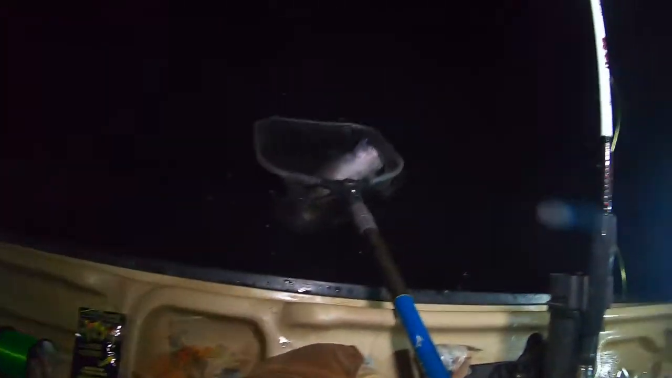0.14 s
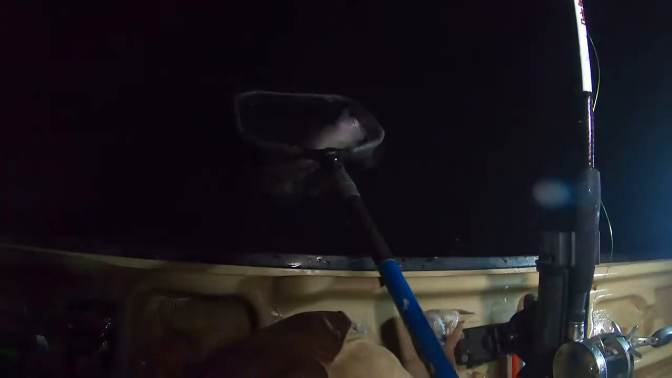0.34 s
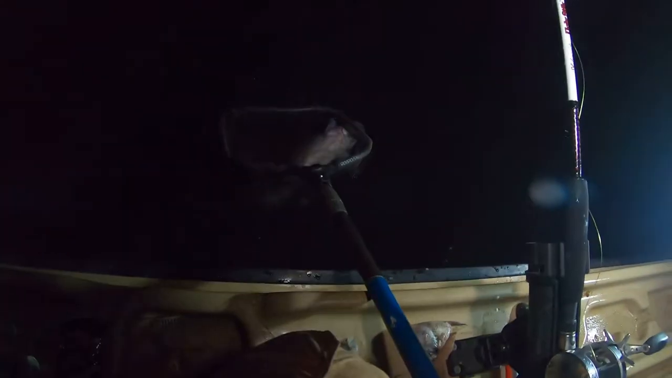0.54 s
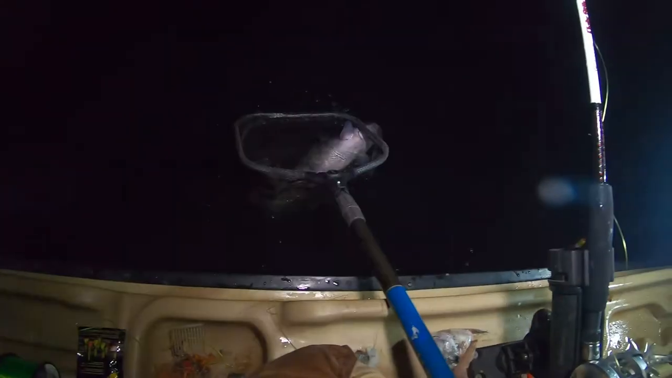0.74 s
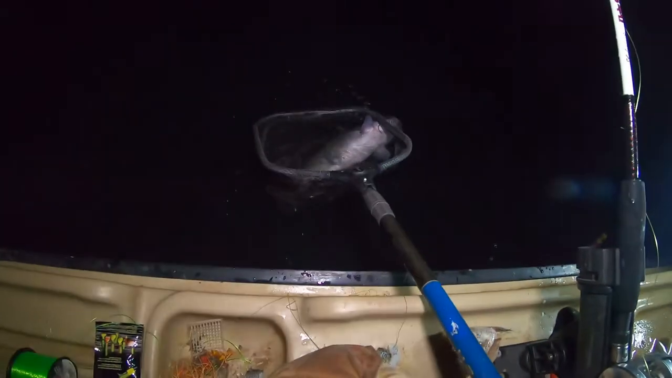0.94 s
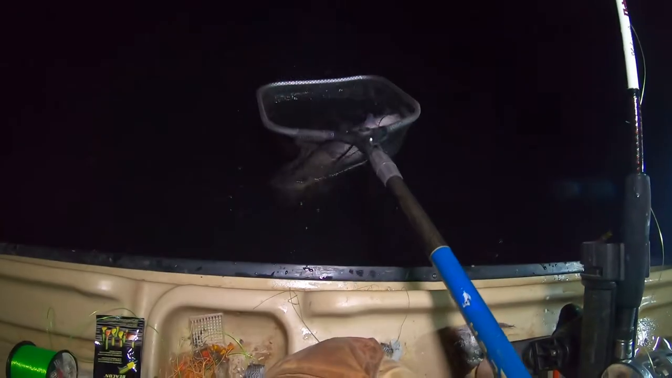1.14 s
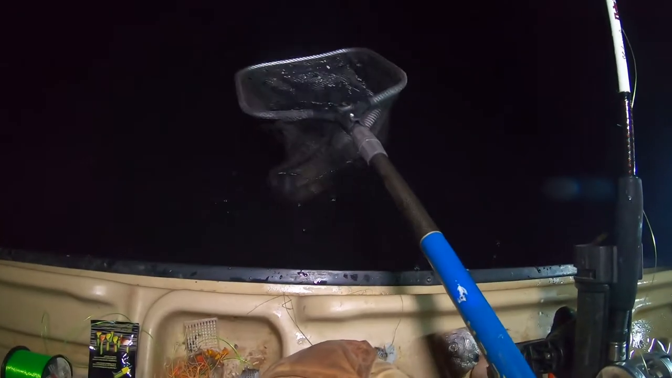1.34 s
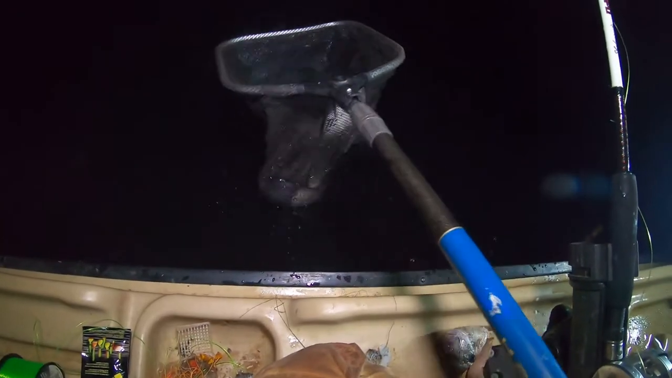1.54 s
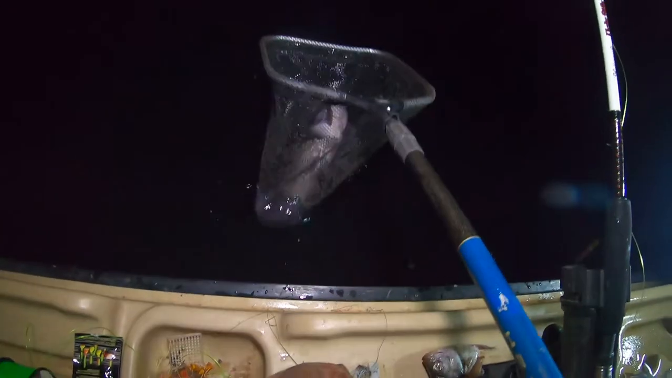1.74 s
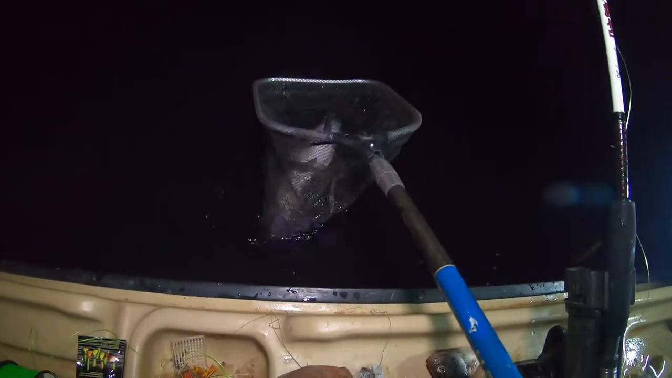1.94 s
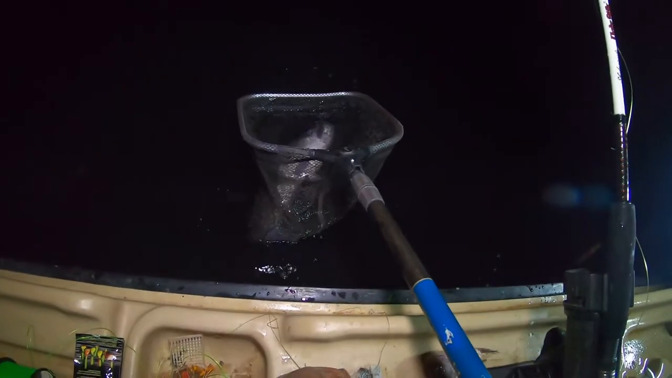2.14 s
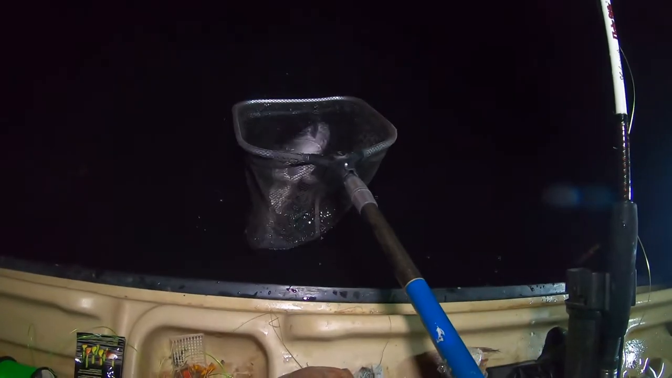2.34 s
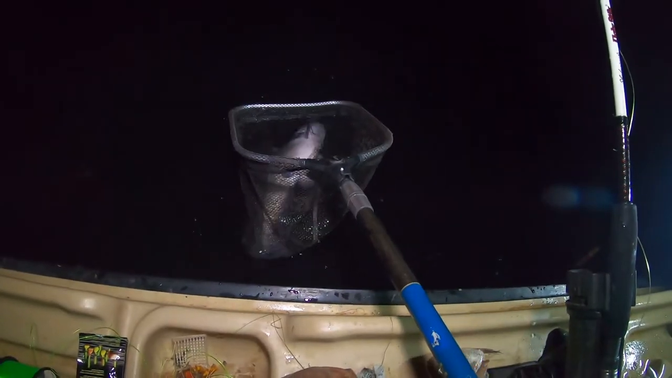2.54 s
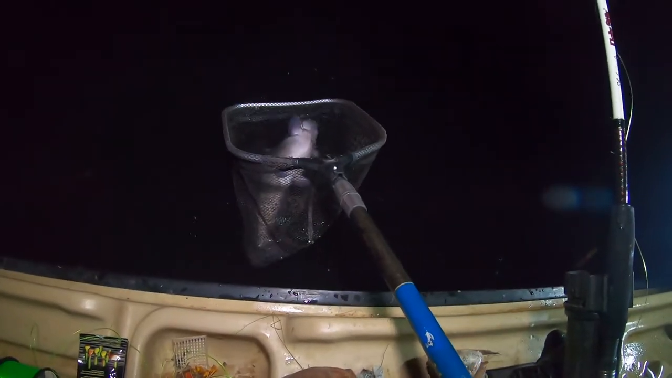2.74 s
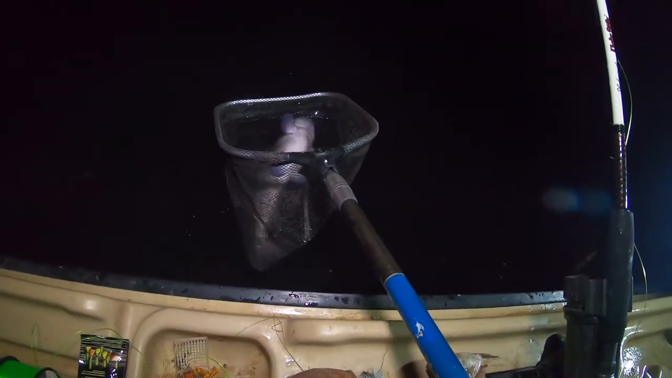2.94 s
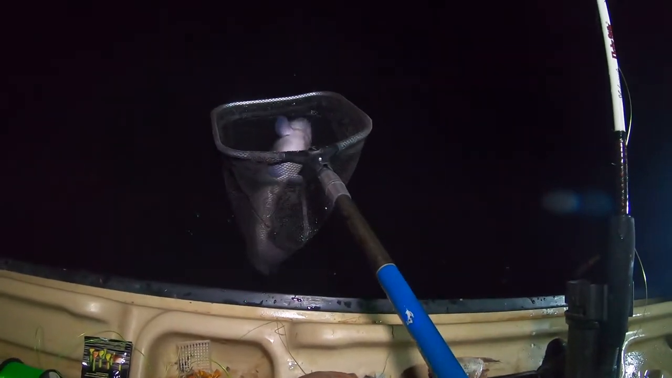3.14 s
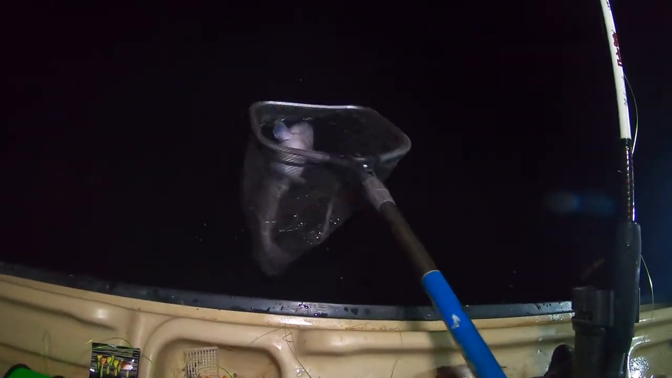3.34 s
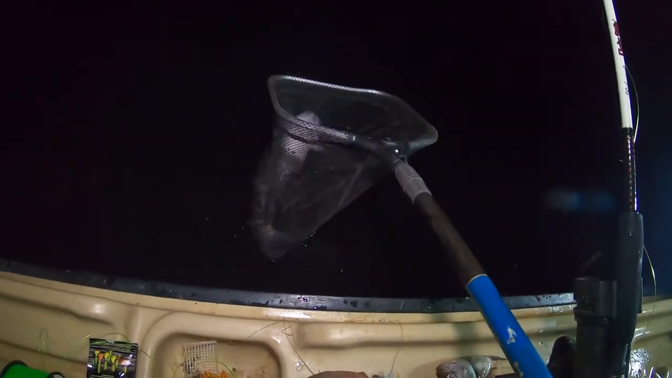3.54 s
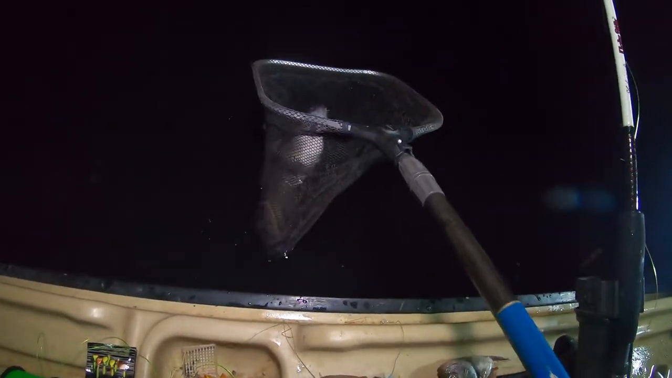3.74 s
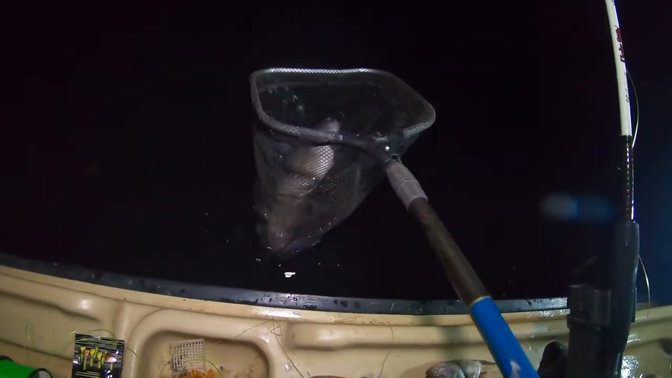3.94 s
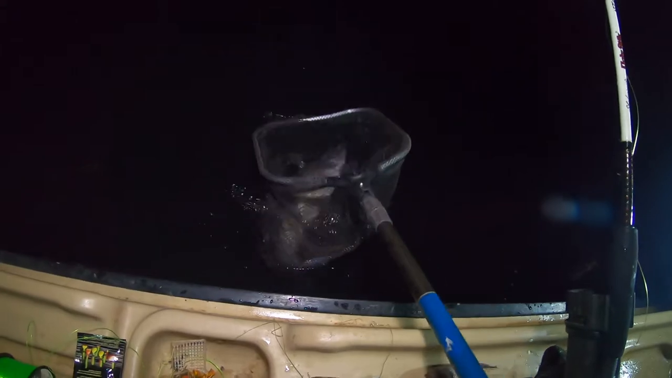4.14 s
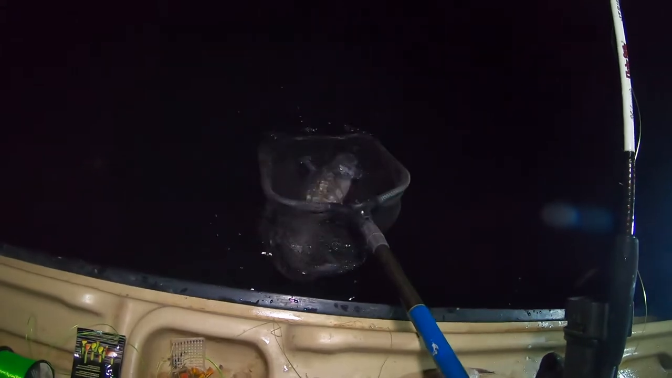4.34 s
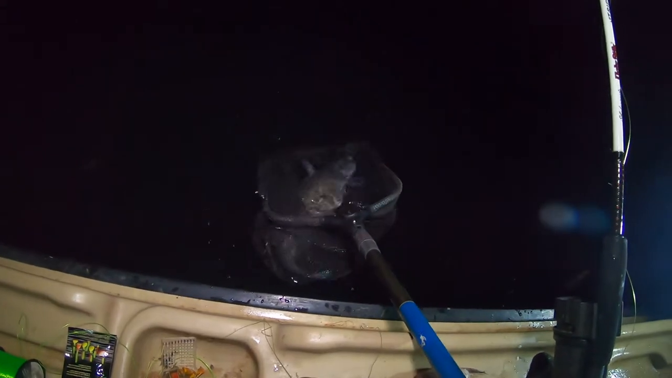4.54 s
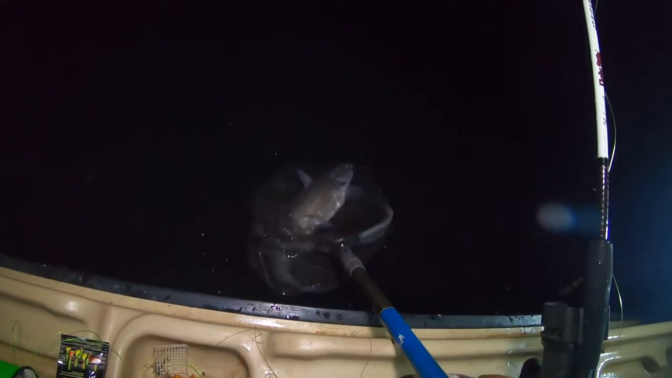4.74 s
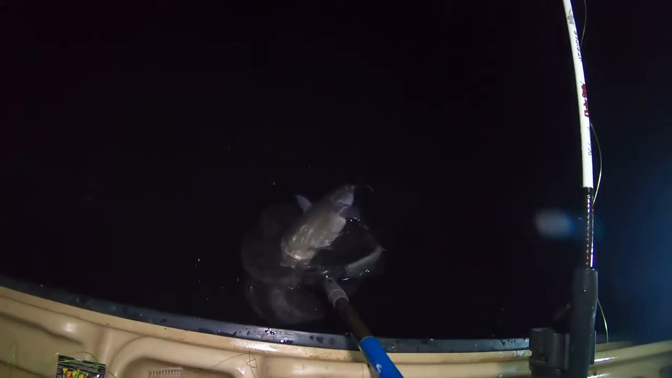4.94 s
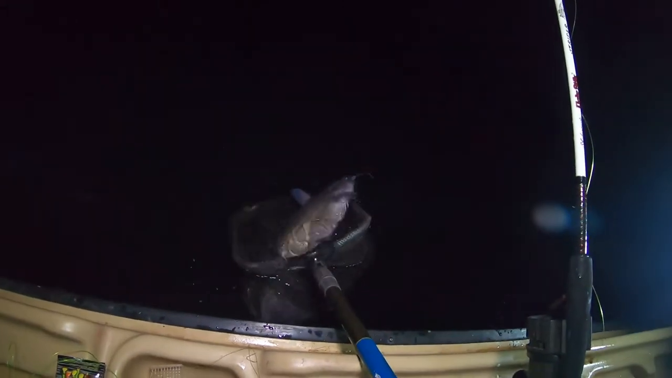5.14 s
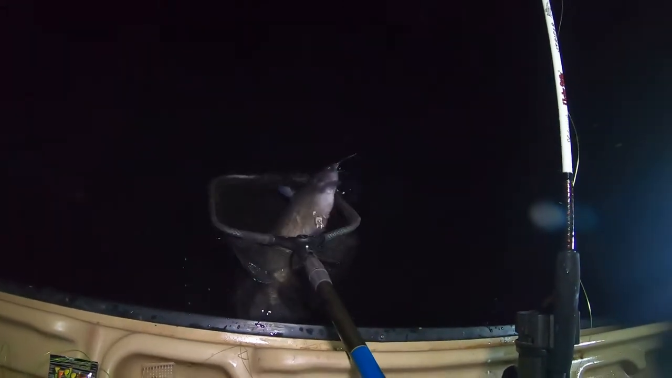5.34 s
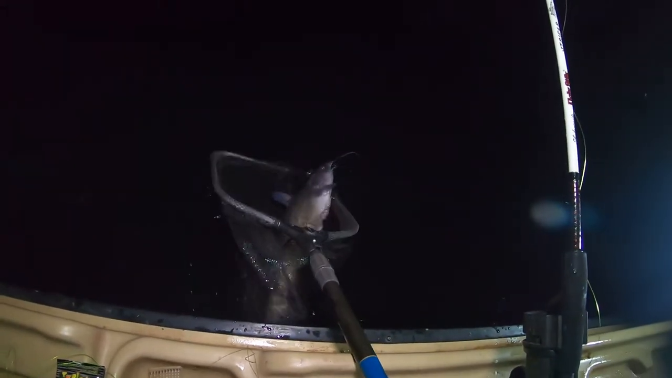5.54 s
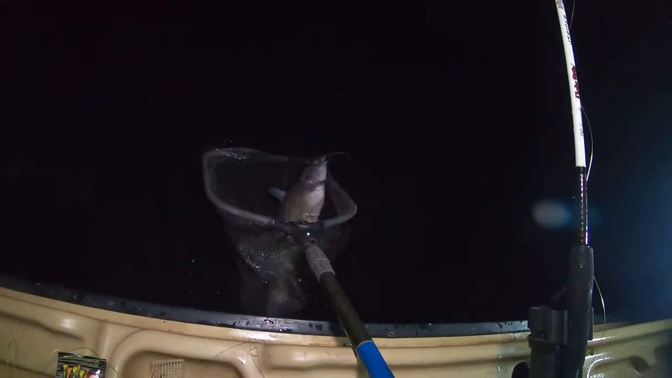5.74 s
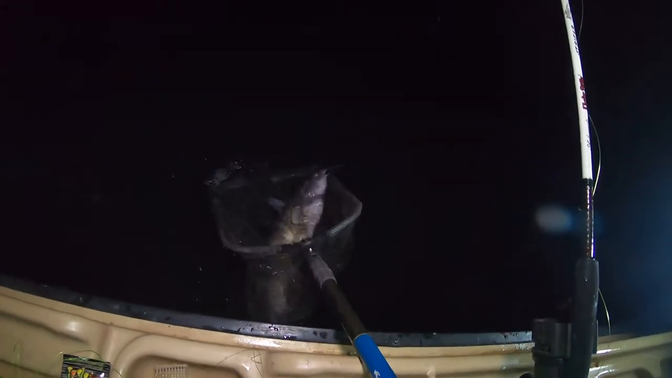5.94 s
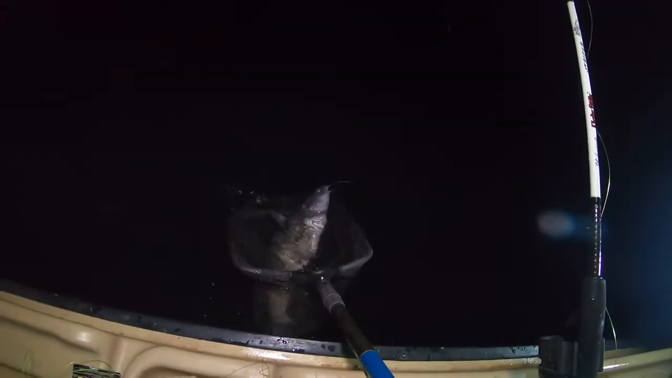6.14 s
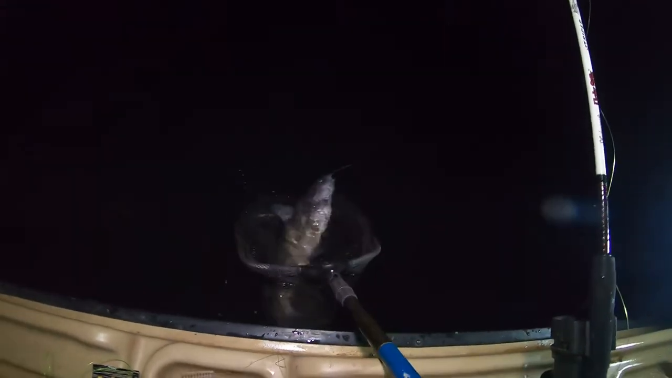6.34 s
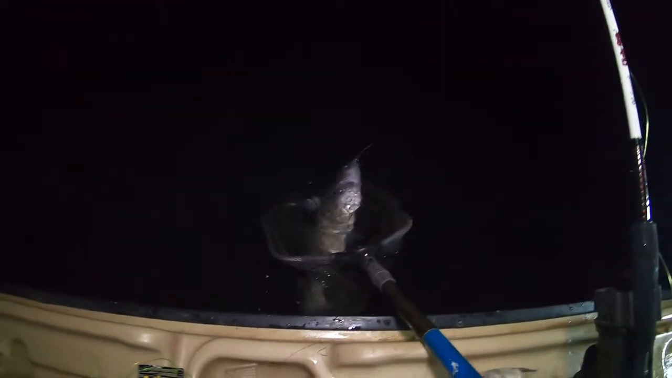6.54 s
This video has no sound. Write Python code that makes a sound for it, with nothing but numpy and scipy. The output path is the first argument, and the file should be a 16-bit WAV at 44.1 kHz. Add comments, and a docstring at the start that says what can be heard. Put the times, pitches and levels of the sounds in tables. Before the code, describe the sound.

Close to a body-worn camera on a small boat, sleeves and wet mesh rustle over a low hull drone and faint breeze. Sparse drips patter from a landing net, thicken around two and four seconds, then the net plunges with dull gurgling thuds. The handle rubs, a sharp ringing click sounds at five seconds, and near the end loud hollow knocks and a crisp splash burst out, falling back to drips.

```python
"""A wet landing net drips, dips under and gurgles beside a small boat at night as a fish is let go.
Water is sine bubbles with climbing pitch, noise splats and fizz, and throbbing air pockets with slosh.
A sharp click rings (modes and noise), a rough chord swells before a knock, the pole knocks on the hull.
Close to a body-worn camera, noise bands make the sleeves, mesh, rubbing handle and scuffed case;
under them lie the low drone of the hull, a breeze at the microphone ports and thin hiss."""
import sys
import numpy as np
from scipy import signal
from scipy.fft import rfft, irfft, next_fast_len
from scipy.io import wavfile
from scipy.ndimage import uniform_filter1d, map_coordinates

SR = 44100
rng = np.random.default_rng(int(sys.argv[2]) if len(sys.argv) > 2 else 0)


def generate_wav(sig):
    """Save sig (samples, or channels by samples) to the path in sys.argv[1] as 16-bit PCM at SR."""
    pcm = np.round(np.clip(np.atleast_2d(sig).T, -1, 1) * 32767).astype(np.int16)
    wavfile.write(sys.argv[1], SR, pcm)


N = 291060


def amp(db):
    """Decibels to gain."""
    return 10 ** (np.asarray(db) / 20)


def unit(x):
    """x at rms 1."""
    return x / np.sqrt(np.mean(x ** 2) + 1e-20)


def along(points, hz):
    """(Hz, value) points read on a log frequency axis."""
    f, v = np.transpose(points)
    return np.interp(np.log(hz + 1), np.log(f + 1), v)


def curves(rows):
    """One value per sample for each column after the time."""
    s, *cols = np.transpose(rows)
    return [np.interp(np.arange(N) / SR, s, c) for c in cols]


def wobble(rate):
    """A smooth random curve, rate knots a second."""
    knots = rng.standard_normal(int(N * rate / SR) + 4)
    return map_coordinates(knots, [np.arange(N) * rate / SR])


def filtered(x, response):
    """x times a response of frequency."""
    size = x.shape[-1]
    m = next_fast_len(size + 8192)  # padding keeps the tail from wrapping round
    spectrum = rfft(x, m) * response(np.fft.rfftfreq(m, 1 / SR))
    return irfft(spectrum, m)[..., :size]


def noise(colour, size, alike=1):
    """Stereo noise of rms 1 in the given colour; alike is the correlation of left and right."""
    mid, side = filtered(rng.standard_normal((2, size)), lambda hz: amp(along(colour, hz)))
    turn = np.arccos(np.clip(alike, -1, 1)) / 2
    return unit(mid * np.cos(turn) + np.outer([1, -1], side) * np.sin(turn))


def swell(t, rise, t60):
    """A smooth rise to 1, then an exponential fall of 60 dB in t60 seconds."""
    attack = np.sin(np.pi / 2 * np.minimum(t / rise, 1)) ** 2
    return attack * amp(-60 * np.maximum(t - rise, 0) / t60)


def humps(times, levels_db, fades):
    """Gain of overlapping swells, each growing and fading evenly in dB around its peak."""
    rise_share = 0.852  # a swell builds up in this share of the time it takes to fade
    t = np.arange(N) / SR
    power = 0
    for s, db, fade in zip(times, levels_db, fades):
        from_peak = np.maximum(t - s, (s - t) / rise_share)
        power = power + amp(db - 20 * from_peak / fade) ** 2
    return np.sqrt(power)


def panned(db):
    """Left and right gains for a left-minus-right level difference."""
    return amp(np.array([[db], [-db]]) / 2)


def add(track, s, sound):
    """Mix a sound into the track at time s."""
    start = max(round(s * SR), 0)
    track[:, start:start + sound.shape[-1]] += sound[..., :N - start]


def shower_flow():
    """Gain of the falling water: each shower builds up and drains away."""
    # the net or the fish sheds droplets: (time [s], level [dB], rise [s], t60 [s])
    showers = [(0, -67, .6, 2), (1.15, -68, .15, 2), (1.55, -58, .43, .6), (2.1, -74, .05, 4),
               (3.45, -66, .4, 1.8), (4.06, -53, .2, .45), (4.55, -62.5, .2, 3), (5.88, -41, .025, .4),
               (5.98, -41, .04, .17), (6.05, -64, .05, 1.8)]
    t = np.arange(N) / SR
    power = 1e-12
    for s, db, rise, t60 in showers:
        power = power + (amp(db) * swell(np.maximum(t - s, 0), rise, t60)) ** 2
    return np.sqrt(power)


def spray(share, pitch_hz, spread, cycles, glide, size_db):
    """A share of the countless droplets, each a few cycles of a tiny bubble with a climbing pitch."""
    # droplets a second at the reference level; louder showers are denser by the power of crowding
    droplet_rate, reference_db, crowding = 300, -65, .8
    flow = shower_flow()
    rate = share * droplet_rate * (flow / amp(reference_db)) ** crowding
    due = np.cumsum(rate) / SR
    when, pitch, strength, life, side = rng.random((int(due[-1]), 5)).T[:, :, None]
    starts = np.searchsorted(due, when * due[-1])
    hz = np.clip(pitch_hz * (pitch / (1 - pitch)) ** spread, 900, 10000)
    t = np.arange(SR // 60) / SR
    age = hz * t / (cycles * (.5 + life))
    fade = age * np.exp(-age) * (1 - t / t[-1])
    grains = np.sin(2 * np.pi * hz * t * (1 + glide * t)) * fade
    grains /= np.linalg.norm(grains, axis=1, keepdims=True)
    size = unit(amp(-size_db * np.log(np.maximum(strength, .05))))  # many small drops, few large
    grains *= size * flow[starts] * np.sqrt(SR / rate[starts])
    where = (starts + np.arange(len(t))).ravel()
    ears = [np.bincount(where, (grains * (.5 + lean)).ravel(), N)[:N] for lean in (side, 1 - side)]
    return np.array(ears)


def droplets():
    """A fine spray, fewer and deeper plops, and single chirping drips, all tiny ringing bubbles."""
    fine = spray(share=.7, pitch_hz=4510, spread=0.33, cycles=1.9, glide=5, size_db=4.5) * panned(-2)
    plops = spray(share=.25, pitch_hz=2103, spread=0.22, cycles=3, glide=14.5, size_db=5.5)
    chirps = spray(share=.13, pitch_hz=3500, spread=0.24, cycles=3.6, glide=22, size_db=5.5)
    return amp(-1) * fine + amp(-5.5) * plops + amp(-4.5) * chirps


def boat_echo(x):
    """A brief scatter from the inside of the boat: noise that decays at its own pace in each band."""
    # decay inside the boat: (frequency [Hz], t60 [s])
    boat_decay = [(150, 0.125), (1000, 0.086), (9000, 0.084)]
    hz, t, z = signal.stft(rng.standard_normal((2, SR // 4)), SR, nperseg=256)
    decay = amp(-60 * t / along(boat_decay, hz)[:, None])
    tail = signal.istft(z * decay, SR, nperseg=256)[1]
    return signal.fftconvolve(x, tail / np.linalg.norm(tail[0]), axes=1)[:, :N]


def scrape():
    """Gain of the handle rubbing on the boat, which starts as the net goes under."""
    # pressure of the handle on the boat: (time [s], level [dB])
    pressure = [(4.56, -60.5), (4.93, -54.5), (5.08, -55.5), (5.39, -60), (5.57, -62.5), (5.89, -60.5),
                (6.0, -55.5), (6.28, -66.5), (6.6, -65.5)]
    db, = curves(pressure)
    touching, = curves([(4.54, 0), (4.62, 1)])
    return amp(db) * touching


def rubbing():
    """Friction as noise: strokes swish a sleeve and drag the mesh; the handle rasps near the middle."""
    # strokes of the arms: (peak time [s], sleeve level [dB], mesh level [dB], sleeve's 20 dB fade [s])
    strokes = [(0, -57.5, -60.5, 0.26), (0.24, -58.5, -59.5, 0.3573), (0.7, -60, -61, 0.4349),
               (0.98, -59, -57.5, 0.173), (1.36, -61, -62, 0.16), (1.61, -51, -57.5, 0.2747),
               (1.88, -60, -63.5, 0.18), (3.19, -63, -71.5, 0.22), (3.8, -57.5, -60.5, 0.2717),
               (4.2, -50, -57.5, 0.33), (4.45, -60, -59, 0.2635), (5.21, -44.5, -58, 0.2636),
               (5.42, -58.5, -67.5, 0.58), (5.8, -62.5, -76, 0.59), (6.6, -58, -60.5, 0.07)]
    # colour of the sleeve: (frequency [Hz], relative level [dB])
    swish_colour = [(2000, -10.5), (3700, -2), (5000, -4), (6500, -3), (7500, -1.5), (9000, 1.5),
                    (10000, -12), (11500, -28), (15000, -31.5)]
    # colour of the wet mesh: (frequency [Hz], relative level [dB])
    drag_colour = [(300, 5), (550, -5), (800, -0.5), (1300, -2), (2200, -2), (3500, -6), (5000, -12.5),
                   (9000, -36.5)]
    # colour of the handle's rasp: (frequency [Hz], relative level [dB])
    rub_colour = [(200, 6), (450, 2), (650, -3.5), (900, -0.5), (1300, 2.5), (1700, -4), (3400, -5.5),
                  (5000, -17.5), (8000, -38)]
    sleeve_rest_db, mesh_rest_db = -73, -78  # the arms are never quite still
    times, sleeve_db, mesh_db, fades = np.transpose(strokes)
    sleeve = np.hypot(amp(sleeve_rest_db), humps(times, sleeve_db, fades))
    sleeve = sleeve * amp(-3 + 1.72 * wobble(130)) * noise(swish_colour, N, alike=0.017)
    mesh = np.hypot(amp(mesh_rest_db), humps(times, mesh_db, 1.483 * fades))
    mesh = mesh * amp(2.5 + 2.5 * wobble(74)) * noise(drag_colour, N, alike=-0.27)
    handle = scrape() * amp(5.5 + 0.75 * wobble(95)) * noise(rub_colour, N, alike=0.902)
    return sleeve * panned(-7.0) + mesh * panned(-2.834) + handle


def background():
    """Noise bands: hull drone and rumble fed by the handle, breeze at the ports, flutter and hiss."""
    # colour of the hollow hull: (frequency [Hz], relative level [dB])
    hum_colour = [(50, -28), (100, -11), (125, -9), (160, 1.5), (195, -2.5), (225, -8), (270, -8.5),
                  (330, -15.5), (400, -22.5), (520, -40), (1200, -73.5)]
    # colour of the breeze, shared by the rumble: (frequency [Hz], relative level [dB])
    breeze_colour = [(20, -8), (35, 11), (70, 6), (150, -24), (400, -59.5)]
    # gusts: (peak time [s], level [dB], time to fade by 20 dB [s])
    gusts = [(0.03, -45, 0.07), (0.27, -40, 0.2857), (0.73, -46.5, 0.16), (1.93, -52.5, 0.21),
             (2.95, -46, 0.03)]
    # colour of the fluttering high band: (frequency [Hz], relative level [dB])
    flutter_colour = [(2300, -56), (2950, -5.5), (3250, -7.5), (3520, 1.5), (3750, -2), (4300, -23.5),
                      (6000, -49)]
    # colour of the thin hiss: (frequency [Hz], relative level [dB])
    hiss_colour = [(400, -3.5), (750, 11), (1200, -6), (2400, -35.5), (3200, -11.5), (4100, -22),
                   (5200, -8), (6400, 7), (7400, -7.5), (8900, 0.5), (11500, -29.5), (15000, -23)]
    drone_rest_db, breeze_rest_db = -52, -60.5
    drone_from_scrape_db, rumble_from_scrape_db = 11.5, -0.5  # over the handle's pressure
    hull = np.hypot(amp(drone_rest_db), amp(drone_from_scrape_db) * scrape())
    hull = hull * amp(0.59 * wobble(15)) * noise(hum_colour, N, alike=0.973)
    wind = np.hypot(amp(breeze_rest_db), humps(*np.transpose(gusts)))
    breeze = wind * amp(2.6 * wobble(7.5)) * noise(breeze_colour, N, alike=0.28) * panned(-2.2)
    rumble = amp(rumble_from_scrape_db) * scrape() * noise(breeze_colour, N, alike=.9)
    flutter = amp(-73.0 + 3.86 * wobble(45)) * noise(flutter_colour, N, alike=0.89)
    hiss = amp(-71.0) * noise(hiss_colour, N, alike=0.12) * panned(-1.2)
    return hull + breeze + rumble + flutter + hiss


def gurgle(glide, count=9):
    """Smaller pockets break away one after another, ever weaker, each with its own climbing pitch."""
    middle_hz, spread_octaves = 260, .55  # spread is the standard deviation
    span_s, fall_db, t60_s = .15, 13.5, .065  # how long they keep coming, fade meanwhile, ring of each
    out, t = np.zeros(SR // 2), np.arange(SR // 6) / SR
    for k, (when, size) in enumerate(rng.random((count, 2))):
        late = (k + when) / count
        hz = middle_hz * 2 ** (spread_octaves * np.sqrt(12) * (size - .5))
        level = amp(-fall_db * late) * np.sqrt(middle_hz / hz)  # deeper pockets are louder
        start = int(late * span_s * SR)
        tone = np.sin(2 * np.pi * hz * t * (1 + glide * t))
        out[start:start + len(t)] += level * swell(t, .005, t60_s) * tone
    return out


def plunges():
    """Net and fish push air under: the pocket throbs, the water sloshes shut around it and gurgles."""
    # air pockets pushed under:
    # (time [s], level [dB], pitch [Hz], rise [s], t60 [s], slosh relative to the pocket [dB])
    pockets = [(0.01, -58, 331.4, 0.018, 0.79, -0.5), (0.66, -55, 378.2, 0.0052, 0.283, 0.5),
               (0.715, -45, 69.8, 0.0193, 0.143, -9.5), (0.82, -52.5, 349, 0.0052, 0.305, 1),
               (2.572, -36.5, 123.2, 0.0043, 0.119, -23.5), (4.542, -26, 203.8, 0.00145, 0.079, -5.5),
               (4.706, -21.5, 185.1, 0.0164, 0.185, -5.5), (4.731, -13.5, 86.2, 0.0081, 0.1623, -18),
               (5.284, -36, 104.3, 0.0314, 0.216, -20.5), (5.674, -4.5, 150.9, 0.018, 0.0456, -9),
               (5.706, -7.5, 300, 0.0107, .06, -4), (5.71, -14.5, 100.4, 0.00607, .16, -14),
               (5.807, -13.5, 161.4, .0045, 0.0505, -13), (5.833, -19, 124.6, .012, 0.161, -20.5),
               (5.903, -14.5, 116.2, 0.0075, .062, -17), (5.988, -8.5, 175.2, .0048, 0.041, -6.5),
               (6.03, -14, 146.7, 0.0035, 0.062, -7), (6.085, -30.5, 111.2, .016, 0.211, -12.5),
               (6.316, -38, 235.3, 0.01326, 0.117, 6.5)]
    # colour of the slosh: (frequency [Hz], relative level [dB])
    slosh_colour = [(40, -29.5), (85, -1), (300, 5), (500, -2.5), (800, -14.5), (1500, -21), (4000, -44),
                    (10000, -61.5)]
    gurgle_db = -18  # relative to its plunge
    out, t = np.zeros((2, N)), np.arange(SR // 2) / SR
    for s, db, hz, rise, t60, slosh_db in pockets:
        pocket = np.sin(2 * np.pi * hz * t)
        slosh = amp(slosh_db) * noise(slosh_colour, len(t))
        add(out, s, amp(db) * swell(t, rise, t60) * (pocket + slosh))
        add(out, s + rise, amp(db + gurgle_db) * gurgle(glide=1.3))
    return out


def scuffs():
    """Brushing on the case, as noise, reaches the two microphone ports nearly in opposite phase."""
    # something brushes the camera case: (peak time [s], level [dB], time to fade by 20 dB [s])
    brushes = [(0.03, -55.5, 0.03), (0.23, -47.5, 0.3465), (0.6, -48.5, 0.1022)]
    # colour of the brushing: (frequency [Hz], relative level [dB])
    scuff_colour = [(200, -3), (600, -6), (900, -9), (1250, 4), (1700, -6), (2600, -17.5), (6000, -30.5)]
    chafing_db = -77.5  # faint chafing in between
    gain = np.hypot(amp(chafing_db), humps(*np.transpose(brushes)))
    return gain * amp(2.5 * wobble(60)) * noise(scuff_colour, N, alike=-0.925)


def drops(alike, glide, waver_hz):
    """Each drop splats on the surface and traps a small bubble whose pitch wavers and climbs."""
    # the loudest drops striking the water:
    # (time [s], bubble level [dB], bubble pitch [Hz], left minus right [dB], splat rel. to bubble [dB])
    drips = [(0.4238, -35, 3543, -8, -1), (0.6632, -44.5, 1685, -9.5, -1), (1.32, -38.5, 2590, 2.5, -4.5),
             (1.4085, -35.5, 6046, -8, 11.5), (1.668, -40, 3400, -4.5, -2), (1.7869, -46, 1590, 3, 1.5),
             (1.7981, -35.5, 3385, 1, -3.5), (1.9459, -38.5, 1645, 6, -10), (1.963, -36.5, 8580, -9, -5),
             (1.9742, -25, 2058, 4, -11.5), (1.9897, -35.5, 3540, 0.5, -3), (2.0375, -41, 2960, -1, -3.5),
             (2.096, -48, 4190, 3, -0.5), (3.6202, -48, 8830, -1, 2.5), (3.906, -53, 8330, 11, 9),
             (3.9438, -36.5, 3830, -0.5, -6), (3.985, -45, 2900, 0, -8), (4.0123, -36.5, 3593, -2, -4.5),
             (4.1939, -39.5, 2706, 2.5, -9), (4.247, -31.5, 2872, 0.5, 2.5), (4.2621, -38.5, 5020, 0, 4.5),
             (4.2711, -32.5, 8260, 2, 0.5), (4.3067, -35.5, 5630, -1, 1), (4.3227, -27.5, 1998, 1.5, 1),
             (4.3494, -26, 1133, 3.5, -6), (4.4072, -41.5, 3580, -0.5, 5.5), (4.587, -36, 3720, -0.5, -4.5),
             (4.6825, -27, 4208, -0.5, -11.5), (5.8739, -47, 3180, 0.5, 15.5), (5.8991, -24.5, 3755, 0, -4),
             (5.906, -31, 7660, 8.5, -10.5), (5.9258, -27.5, 3880, -1, 0), (5.952, -31, 2950, 7, -1.5),
             (5.97, -30.5, 5680, -5.5, 5), (5.9957, -21.5, 4783, 1.5, 1.5), (6.0234, -27, 3790, 0, -9),
             (6.0402, -26.5, 1985, 6.5, -2), (6.06, -37.5, 1943, -2, 6), (6.085, -45, 3820, -2, 10),
             (6.1374, -41.5, 5730, 2.5, 2.5), (6.1991, -38.5, 7680, -5, 3), (6.21, -36.5, 2966, -3, -1),
             (6.2544, -44.5, 2380, -1.5, 3.5), (6.3036, -37, 2683, -4.5, -3),
             (6.5778, -42.5, 8470, -4, 1.5)]
    # colour of the splat: (frequency [Hz], relative level [dB])
    splat_colour = [(300, -8), (1200, -9.5), (3700, 5), (5200, 1.5), (9000, 0.5), (11000, -2), (15000, -10)]
    # t60 of a bubble of the reference pitch; smaller bubbles die sooner by the power of ring_fall
    ring_s, ring_hz, ring_fall = 0.0154, 3000, 0.39
    out, t = np.zeros((2, N)), np.arange(SR // 12) / SR
    for s, db, hz, pan_db, splat_db in drips:
        drift = unit(uniform_filter1d(rng.standard_normal(len(t)), size=40))
        waver = waver_hz * hz / ring_hz * drift
        phase = 2 * np.pi * (hz * t * (1 + glide * t) + np.cumsum(waver) / SR)
        bubble = np.sin(phase) * swell(t, 0.00163, ring_s * (ring_hz / hz) ** ring_fall)
        splash = swell(t, 0.0005, 0.0055) + amp(-21.5) * swell(t, 0.0044, 0.02)
        splat = noise(splat_colour, len(t), alike) * splash
        add(out, s + .0004, amp(db) * panned(pan_db) * (bubble + amp(splat_db) * splat))
    return out


def washes(clump_db):
    """Bubbles too many to count merge into a noise-like fizz that comes in clumps."""
    # sheets of water breaking into fizz: (time [s], level [dB], rise [s], t60 [s], bubble pitch [Hz])
    sheets = [(0.591, -44.5, 0.00227, .13, 1860), (0.593, -48, 0.00274, .21, 8000),
              (1.639, -51, 0.039, .25, 3180), (1.97, -44, 0.0049, .14, 2650),
              (4.108, -51.5, 0.0316, 0.334, 2730), (4.243, -41.5, 0.0042, .14, 2960),
              (4.319, -43.5, .007, 0.095, 1400), (4.545, -37.5, 0.0028, 0.127, 3460),
              (4.68, -46, 0.0275, .6, 3706), (4.725, -45.5, 0.032, .27, 560),
              (4.825, -42, 0.0098, .08, 3640), (5.895, -30.5, 0.0076, .055, 7500),
              (5.949, -30.5, 0.0033, .095, 2670), (5.9966, -14.5, 0.00079, .007, 5310),
              (6.005, -34, .004, .16, 1210)]
    # colour of the fizz: (multiple of the bubble pitch, relative level [dB])
    fizz_colour = [(.1, -15.5), (.45, -11), (.8, 1.5), (1.15, 2.5), (1.8, -10), (4, -25)]
    out, t = np.zeros((2, N)), np.arange(SR // 2) / SR
    clumps = unit(amp(clump_db * wobble(450)))
    for s, db, rise, t60, hz in sheets:
        fizz = noise([(hz * ratio, level) for ratio, level in fizz_colour], len(t), alike=0.89)
        add(out, s, amp(db) * swell(t, rise, t60) * fizz)
    return out * clumps


def glugs(tremble_db, waver):
    """Large bubbles tremble and whistle upward as they near the surface."""
    # rising bubbles: (time [s], level [dB], start pitch [Hz], end pitch [Hz], length [s])
    bubbles = [(2.308, -55, 678, 2031, 0.0553), (3.655, -53.5, 847, 1047, 0.0262),
               (4.408, -53, 445.7, 1155, 0.0896), (4.448, -41.5, 916, 2502, 0.0502),
               (4.503, -38, 1442, 2480, 0.0265), (6.039, -28.5, 1559, 2606, .008)]
    out = np.zeros((2, N))
    for s, db, start_hz, end_hz, length in bubbles:
        u = np.linspace(0, 1, int(length * SR))
        hz = start_hz * (end_hz / start_hz) ** u * (1 + waver * wobble(500.3)[:len(u)])
        shape = np.sin(np.pi * u ** 0.705) ** 0.7
        add(out, s, amp(db) * shape * np.sin(2 * np.pi * np.cumsum(hz) / SR))
    return out * amp(tremble_db * wobble(350))


def knocks(ring_db):
    """A short gritty contact rings the hull's resonances; each contact has its own brightness."""
    # the pole against the hull: (time [s], level [dB], rise [s], t60 [s], brightness [Hz])
    contacts = [(4.548, -32.5, 0.0022, 0.06, 5000), (5.206, -22, 0.00289, 0.0197, 5350),
                (5.6626, -34.5, 0.0033, 0.186, 5000), (5.6752, -11, 0.0015, 0.0305, 6570),
                (5.698, -16.5, 0.0021, 0.013, 1800), (5.7053, -12.5, 0.0004, 0.029, 1276),
                (5.798, -35, 0.00654, 0.038, 1000), (5.987, -24, 0.00247, 0.075, 900)]
    # resonances of the hull: (frequency [Hz], width [Hz], relative level [dB])
    resonances = [(852, 27.6, 1), (1041, 79, 1), (1207.6, 71, 0.5), (1555, 88, 2), (1705, 86, -4.5),
                  (2000, 30, -10.5), (2108, 68, -3), (2706, 202, -1.5), (2910, 24, -22.5), (3696, 57, -19),
                  (3749, 68, -2.5), (4350, 150, -57.5)]
    grit_colour = [(300, 5.0), (900, -6), (1800, -1), (3900, -0.5), (5500, -10.5), (8300, -8),
                   (11000, -29.5), (15000, -39.0)]  # (frequency [Hz], relative level [dB])
    out, t = np.zeros((2, N)), np.arange(SR // 4) / SR

    def hull(f):
        """Band-pass resonances summed with alternating signs."""
        return sum((-1) ** k * amp(db) * 1j * f * width / (centre * centre - f * f + 1j * f * width)
                   for k, (centre, width, db) in enumerate(resonances))

    for s, db, rise, t60, bright_hz in contacts:
        shape = swell(t, rise, t60)
        contact = shape * noise(grit_colour, len(t))[0]
        knock = filtered(contact, lambda f: (1 + amp(ring_db) * hull(f)) / (1 + 1j * f / bright_hz) ** 2)
        add(out, s, amp(db) * knock * np.linalg.norm(shape) / np.linalg.norm(knock))
    return out


def ringing_click():
    """A sharp click with a soft ringing swell leading into it; each part has noise and ringing modes."""
    # parts of the click:
    # (time [s], level before a common 5.5 dB cut [dB], rise [s], noise relative to ring [dB])
    parts = [(4.971, -27, 0.0169, -18.5), (4.989, -17, 0.0048, -20), (4.9972, -12.5, 0.00247, -24),
             (5.0028, -6.5, 0.00244, -19.5), (5.0067, -24.5, 0.00097, 14.5)]
    # ringing modes: (frequency [Hz], relative level [dB], t60 [s])
    modes = [(2041.7, 2, 0.0362), (2095, -12, 0.039), (2597.3, 0, 0.0456), (3079, -7.5, 0.025),
             (4750, -14, 0.063), (5950, -31.5, .04), (10750, -31, .03), (13380, -41.5, 0.0277)]
    crack_colour = [(200, 2.5), (450, -0.5), (3000, 9.5), (5500, -4.5), (8500, -1.0), (11000, -15.5),
                    (15000, -30)]  # (frequency [Hz], relative level [dB])
    out, t = np.zeros((2, N)), np.arange(SR // 6) / SR
    for s, db, rise, crack_db in parts:
        ring = sum(amp(level) * swell(t, rise, t60) * np.sin(2 * np.pi * hz * t)
                   for hz, level, t60 in modes)
        crack = swell(t, rise, 0.0216) * noise(crack_colour, len(t))
        add(out, s, amp(db - 5.5) * (ring + amp(crack_db) * crack))
    return out


def rough_chord(rough):
    """A short, slightly rough chord of sines swells up just before the hardest knock."""
    # partials of the chord: (frequency [Hz], relative level [dB])
    partials = [(1820, -1), (2860, -0.5), (3890, -0.5), (4920, -15.5), (7920, -15.5)]
    start_s, level_db, rise_s, t60_s = 5.642, -36, .036, .04
    out, t = np.zeros((2, N)), np.arange(SR // 8) / SR
    steps = rng.standard_normal((len(partials), len(t)))
    drift = rough * np.cumsum(steps, axis=1) / np.sqrt(SR)  # the phases wander
    chord = sum(amp(db) * np.sin(2 * np.pi * hz * t + phase) for (hz, db), phase in zip(partials, drift))
    add(out, start_s, amp(level_db) * swell(t, rise_s, t60_s) * chord)
    return out


def scene():
    """Water out in the open; the thuds, knocks, click and chord stand in the middle."""
    # the camera case muffles the top of the water: (frequency [Hz], gain [dB])
    case_gain = [(9300, -1.5), (10300, -9.5), (11500, -14.5), (15000, -15.5)]
    water = droplets() + drops(alike=0.7, glide=6.9, waver_hz=190.5)
    water = water + washes(clump_db=4.5) + glugs(tremble_db=3, waver=0.026)
    water = filtered(water + amp(-9) * boat_echo(water), lambda hz: amp(along(case_gain, hz)))
    no_bass = signal.butter(2, 58, "high", fs=SR, output="sos")  # small pockets radiate no deep bass
    thuds = signal.sosfilt(no_bass, plunges())
    hard_sounds = knocks(ring_db=8.0) + ringing_click() + rough_chord(rough=13)
    return water + thuds + hard_sounds + rubbing() + scuffs() + background()


def record(dry):
    """The camera keeps nothing above its band limit."""
    top_hz = 15800
    return filtered(dry, lambda hz: hz < top_hz)


dry = scene()
out = record(dry)
generate_wav(out)
```